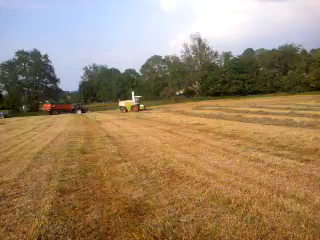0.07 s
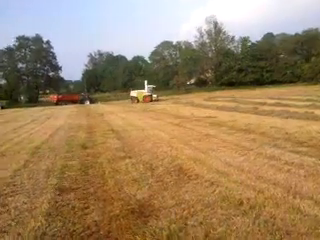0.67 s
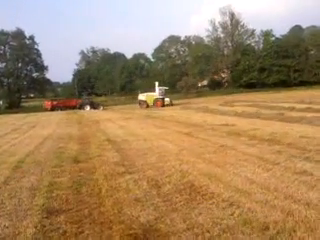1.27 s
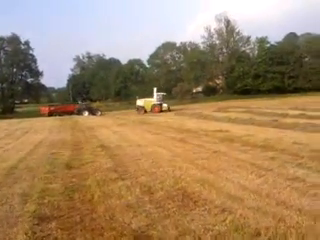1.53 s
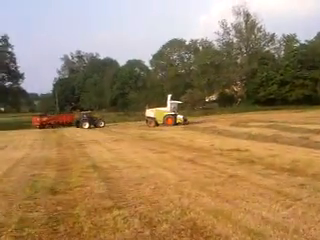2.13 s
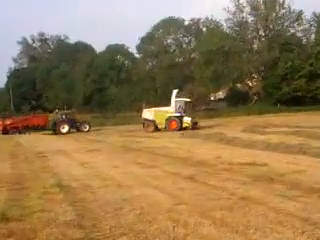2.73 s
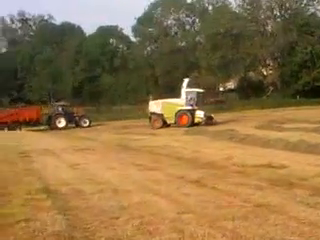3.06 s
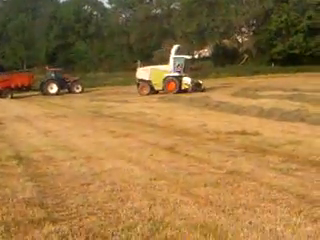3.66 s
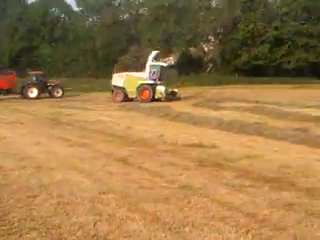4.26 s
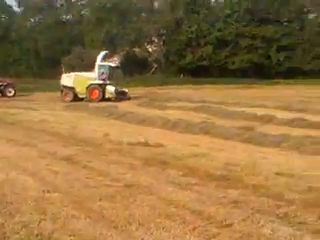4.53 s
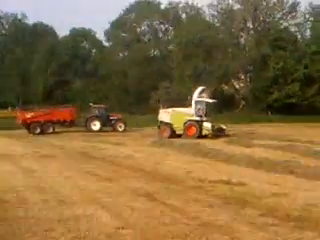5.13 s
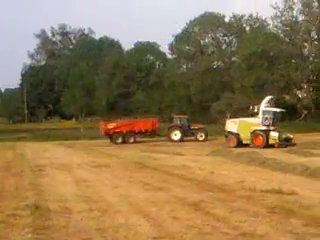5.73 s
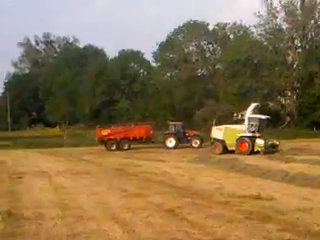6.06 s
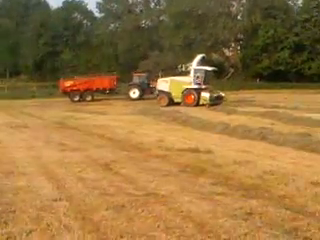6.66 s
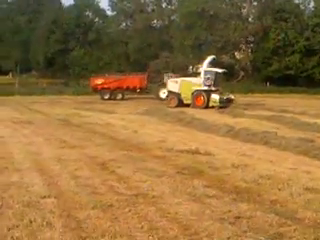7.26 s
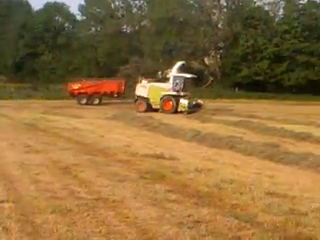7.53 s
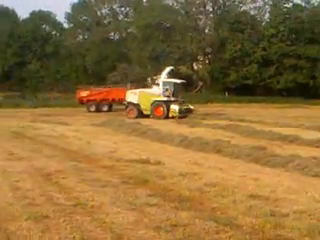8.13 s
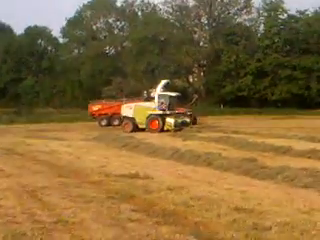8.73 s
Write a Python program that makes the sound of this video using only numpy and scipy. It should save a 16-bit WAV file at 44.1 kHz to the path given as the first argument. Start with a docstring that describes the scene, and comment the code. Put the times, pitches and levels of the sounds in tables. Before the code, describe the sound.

Wind bumps and rumbles on the microphone over the steady diesel roar of a harvester and tractor across a field.

```python
"""A forage harvester roars across a distant stubble field beside a tractor and trailer; both diesels drone.
Its chopper and blower make broadband noise, its exhaust harmonics, its cutter drum and drive train whines.
A hand cupped near the microphone makes the roar honk, then slides away with a short swoosh.
Gusts buffet the small camera's microphone with short eddies, and the strongest ones overload it."""
import sys
import numpy as np
from scipy import signal
from scipy.fft import rfft, irfft, next_fast_len
from scipy.io import wavfile
from scipy.ndimage import uniform_filter1d, map_coordinates

SR = 44100
rng = np.random.default_rng(int(sys.argv[2]) if len(sys.argv) > 2 else 0)


def digitize_waveform(pressure):
    """Quantize a signal to 16-bit integers and store it at the path in sys.argv[1].

    Rows of a 2-D input are taken as channels; values are limited to [-1, 1].
    """
    field = np.atleast_2d(pressure).T
    bounded = np.clip(field, -1, 1)
    quanta = np.round(bounded * 32767).astype(np.int16)
    wavfile.write(sys.argv[1], SR, quanta)


N = 392490
TIME_S = np.arange(N) / SR
FIRING_HZ = 123.8  # the harvester's diesel
BREEZE_DB = -32.5  # wind level between gusts
OPEN_S = 0.68  # the microphone opens


def amp(db):
    """Amplitude ratio of a level in decibels."""
    return 10 ** (np.asarray(db) / 20)


def unit(x):
    """Normalisation to rms 1."""
    return x / np.sqrt(np.mean(x ** 2) + 1e-20)


def envelope(rows):
    """Amplitude envelope through (time_s, level_db) points."""
    return amp(np.interp(TIME_S, *np.transpose(rows)))


def swells(base_db, rows):
    """Powers add: the level in dB of a steady base plus Gaussian swells."""
    extra = sum(amp(db) ** 2 * np.exp(-((TIME_S - s) / length) ** 2) for s, db, length in rows)
    return 10 * np.log10(amp(base_db) ** 2 + extra)


def along(points, hz):
    """Interpolation of (frequency_hz, level_db) points on a log-frequency axis."""
    f, db = np.transpose(points)
    return np.interp(np.log(hz + 1), np.log(f), db)


def bell(hz, centre, width):
    """A Gaussian of height 1 on the log-frequency axis."""
    return np.exp(-(np.log((hz + 1) / centre) / width) ** 2)


def wobble(rate_hz):
    """Slow random modulation: a spline through rate_hz knots a second."""
    knots = rng.standard_normal(int(N * rate_hz / SR) + 4)
    return map_coordinates(knots, [TIME_S * rate_hz])


def filtered(x, response):
    """Linear filtering: the spectrum times a frequency response."""
    m = next_fast_len(len(x) + 8192)
    return irfft(rfft(x, m) * response(np.fft.rfftfreq(m, 1 / SR)), m)[:len(x)]


def noise(spectrum):
    """Coloured noise of rms 1, silent above the spectrum's last point."""
    white = rng.standard_normal(N)
    return unit(filtered(white, lambda hz: amp(along(spectrum, hz)) * (hz < spectrum[-1][0])))


def whine(centre_hz, width_hz):
    """A narrow resonance driven by noise gives a rough pitch, at rms 1."""
    white = rng.standard_normal(N)
    return unit(filtered(white, lambda hz: 1 / (1 + ((hz - centre_hz) / width_hz) ** 2)))


def far(x, patchy_db):
    """Frequency-selective fading: moving air makes each band swell and fade on its own."""
    bands = signal.stft(x, nperseg=1024)[2]
    fading = uniform_filter1d(rng.standard_normal(bands.shape), size=9, axis=0)
    fading = unit(uniform_filter1d(fading, size=8, axis=1))
    return unit(signal.istft(bands * amp(patchy_db * fading), nperseg=1024)[1][:N])


def tone(hz, fading_db, smear_rad):
    """Scintillation: a distant tone of rms 1 flutters in amplitude and phase on its way."""
    phase = 2 * np.pi * np.cumsum(hz) / SR + smear_rad * wobble(14)
    return unit(amp(fading_db * np.tanh(wobble(9))) * np.sin(phase))


def wind(wind_db):
    """Turbulence rumbles at the microphone port; faster air adds smaller, higher swirls."""
    # spectrum of the large swirls: frequency_hz, density_db
    rumble_spectrum = [(20, -19), (45, -11.5), (70, -5.5), (110, 6), (170, 2.5), (250, -6.5), (350, -13.5),
                       (500, -23), (1000, -45.5)]
    # spectrum of the fine swirls: frequency_hz, density_db
    flutter_spectrum = [(100, -12.5), (220, 3), (330, -4), (500, -6.5), (800, -9), (1400, -19.5),
                        (3500, -29.5)]
    gust_db = wind_db - BREEZE_DB
    lumps = np.tanh(wobble(30))
    rumble = unit(amp(3.4 * lumps) * noise(rumble_spectrum))
    flutter = unit(amp(lumps + 6.4 * np.tanh(wobble(45))) * noise(flutter_spectrum))
    return amp(-30 + 0.85 * gust_db) * rumble + amp(-44 + 1.464 * gust_db) * flutter


def eddies(rows):
    """Each eddy is a pressure transient: uneven swings that rise fast, die slower and shed finer swirls."""
    out = np.zeros(N + SR)
    t = np.arange(-SR // 8, SR // 8) / SR
    for centre_s, db, pitch_hz, length_s in rows:
        unrest = unit(filtered(rng.standard_normal(len(t)), lambda hz: np.exp(-(hz / pitch_hz) ** 2)))
        swing_hz = pitch_hz * (1 + 0.55 * np.tanh(unrest))
        phase = 2 * np.pi * (np.cumsum(swing_hz) / SR + rng.random())
        swirls = unit(filtered(rng.standard_normal(len(t)), lambda hz: bell(hz, 1.4 * pitch_hz, 0.88)))
        swell = np.exp(-(t / (length_s * np.where(t < 0, 0.55, 1.02))) ** 2)
        pressure = 0.65 * np.sin(phase) + 0.16 * amp(0.69 * db) * swirls
        out[round((centre_s + t[0]) * SR):][:len(t)] += amp(db) * swell * pressure
    return out[:N]


def small_eddies(wind_db, per_s=12):
    """Turbulence brings eddies at random: the stronger the wind, the harder, higher and shorter."""
    slots_s = np.arange(OPEN_S, N / SR, 1 / per_s)
    time_scatter, level_scatter, pitch_scatter = rng.uniform(-1, 1, size=(len(slots_s), 3)).T
    centre_s = slots_s + time_scatter / per_s / 2
    local_db = np.interp(centre_s, TIME_S, wind_db)
    level_db = np.minimum(local_db + 11 + 3 * level_scatter, -7)
    pitch_hz = 148 * 2 ** (0.045 * (local_db - BREEZE_DB) + 0.35 * pitch_scatter)
    length_s = 2.2 / pitch_hz  # 2.2 cycles
    return eddies(zip(centre_s, level_db, pitch_hz, length_s))


def hard_eddies():
    """The largest pressure swings of the turbulence strike the microphone as separate thumps."""
    # strong eddies: centre_s, level_db, pitch_hz, length_s
    thumps = [(0.714, -2, 270, .025), (1.126, -6.5, 250, .018), (1.515, -2, 290, .011),
              (1.544, -0.3, 245, .016), (1.576, 0, 191.4, .007), (1.664, -1, 245, 0.02),
              (1.891, -8, 210.7, 0.013), (1.944, -8.5, 370, 0.0062), (2.052, .5, 210, 0.0049),
              (2.38, -5.5, 150.4, 0.011), (2.429, -.5, 159, 0.012), (2.511, 1.5, 609, .004),
              (2.536, 0.5, 280, 0.015), (2.585, -1.5, 340, 0.033), (2.636, 1, 560, 0.0028),
              (2.688, 1.2, 480, .0045), (2.764, -1.5, 400, .018), (2.807, -2.5, 200, 0.0067),
              (2.94, -2, 370, .005), (2.958, -1.5, 330, .006), (2.982, -.5, 210, 0.01),
              (3.018, 0.5, 320, .0035), (3.255, -6.5, 220, 0.017), (3.33, -7, 340, 0.0074),
              (3.555, -3.5, 185, 0.0098), (4.155, -7, 215, .03), (4.377, -11, 320, 0.019),
              (4.497, -13, 450, .007), (4.563, 1.3, 220, .006), (4.595, -5.5, 195, .025),
              (4.66, -8.5, 199.2, 0.015), (6.744, 1, 160, .008), (6.795, -7.5, 160, .019),
              (7.298, -11, 158.9, 0.028), (7.658, -9, 144.1, 0.019), (8.66, -8.5, 160, 0.05)]
    return eddies(thumps)


def past_hand(x, slide_s=4.82, time_constant_s=0.12):
    """Cavity resonance in a cupped palm colours sound; as it opens, a notch and a peak slide down."""
    # response of the palm's hollow: frequency_hz, gain_db
    hollow = [(250, -2.5), (500, -4), (700, 2), (900, 9.5), (1170, -0.5), (1500, 8), (1750, 7.5),
              (2000, 5.5), (2300, -1), (2750, -5), (3300, -1), (4000, -0.5)]
    cupped_hz, open_hz = 2900, 1600
    hz, t, bands = signal.stft(x, SR, nperseg=512)
    hz = hz[:, None]
    cupping = np.exp(-np.maximum(t - slide_s, 0) / time_constant_s)
    notch_hz = open_hz + (cupped_hz - open_hz) * cupping
    depth_db = 1.5 * cupping + 6.5 * np.sin(np.pi * cupping)  # deepest in mid slide
    ripple = bell(hz, 1.45 * notch_hz, width=0.19) - bell(hz, notch_hz, width=0.39)
    gain_db = cupping * along(hollow, hz) + depth_db * ripple
    return signal.istft(bands * amp(gain_db), nperseg=512)[1][:N]


def squeak(centre_s=8.37, half_length_s=0.025):
    """A short burst of narrow-band noise is heard as a rough squeak from the machines."""
    swell = np.exp(-((TIME_S - centre_s) / half_length_s) ** 2)
    return amp(-31) * swell * whine(2350, width_hz=82)


def tractor(firing_hz=113.1):
    """The tractor's firing note lies close to the harvester's, so the two interfere and beat."""
    # course of the drone: time_s, level_db
    drone_levels = [(0.7, -40.5), (5.1, -42), (5.7, -30), (7.9, -31.5), (8.9, -28.5)]
    pitch_hz = firing_hz * (1 + 0.002 * wobble(2))
    return envelope(drone_levels) * tone(pitch_hz, fading_db=1.5, smear_rad=0.25)


def cutter(firing_hz, pitch_hz=1826, rough_share=0.45):
    """The drum's tone is proportional to engine speed; passing crop adds narrow-band noise."""
    # swells of the whine, relative to the roar: centre_s, level_db, half_length_s
    surges = [(1.82, -8.5, 0.13), (3.754, -10.5, .38)]
    clean = np.sqrt(1 - rough_share) * tone(pitch_hz * firing_hz / FIRING_HZ, fading_db=3, smear_rad=1)
    rough = np.sqrt(rough_share) * whine(pitch_hz, width_hz=15)
    return amp(swells(base_db=-17, rows=surges)) * (clean + rough)


def harvester():
    """Periodic firing gives exhaust harmonics and modulates the chopper's roar, amid whines and hiss."""
    # spectrum of the chopper: frequency_hz, density_db
    chopper_spectrum = [(200, -7), (430, -7.5), (640, 0.5), (900, -3.5), (1170, 3), (1400, 1), (1650, -1),
                        (1950, -0.5), (2500, -4.5), (3000, -8), (3600, -12.5), (4000, -25), (4500, -41)]
    # exhaust partials, relative to the roar: harmonic_number, level_db
    harmonics = [(1, -7.5), (2, -11), (4, -15), (5, -23.5), (6, -21.5), (7, -20), (8, -23), (9, -17.5),
                 (10, -20), (11, -17.5)]
    # drive train resonances, relative to the roar: pitch_hz, width_hz, level_db
    resonances = [(1513, 4.6, -16.5), (1121, 13, -12.5), (1240, 29, -20.5)]
    # course of the roar: time_s, level_db
    roar_levels = [(0.7, -28), (1.05, -26), (1.4, -28.5), (2.9, -29), (3.6, -29), (6.1, -28.5),
                   (8.9, -29.5)]
    # spectrum of the blower: frequency_hz, density_db
    blower_spectrum = [(2200, -23.5), (3000, -1.5), (3500, 0.5), (3800, -1), (4200, -14.5), (4600, -32.5)]
    # course of the blower's hiss: time_s, level_db
    hiss_levels = [(0.7, -47.5), (1.9, -40.5), (2.3, -48), (4.4, -51.5), (5.2, -46.5), (6.1, -44),
                   (6.4, -52), (8.9, -56.5)]
    firing_hz = FIRING_HZ * (1 + 0.001502 * wobble(3))
    throb = 1 + 0.12 * np.sin(2 * np.pi * np.cumsum(firing_hz) / SR)
    churn = amp(1.1 * wobble(40))
    chopper = throb * churn * far(noise(chopper_spectrum), patchy_db=1.49)
    exhaust = sum(amp(db) * tone(k * firing_hz, fading_db=2, smear_rad=0.5) for k, db in harmonics)
    drive = sum(amp(db) * whine(hz, width) for hz, width, db in resonances)
    hiss = envelope(hiss_levels) * churn * far(noise(blower_spectrum), patchy_db=3)
    return envelope(roar_levels) * (chopper + exhaust + drive + cutter(firing_hz)) + hiss


def scene():
    """Superposition: distant machines, filtered by the hand, add to the wind at the microphone."""
    # gusts of wind: centre_s, level_db, half_length_s
    gusts = [(0.979, -25, .13), (1.58, -24.5, .09), (1.97, -25, .12), (2.331, -23.5, .14),
             (2.633, -14.5, .16), (3.194, -21.5, .36), (4.159, -24.5, .06), (4.518, -23, .12),
             (5.55, -27, .16), (6.652, -27, .17), (8.698, -24, .23)]
    wind_db = swells(BREEZE_DB, gusts)
    machines = past_hand(harvester() + tractor() + squeak())
    return (machines + wind(wind_db) + hard_eddies() + small_eddies(wind_db))[None]


def record(dry):
    """A band-limited microphone opens late, fades in and saturates on the strongest eddies."""
    ramp_s, fade_s, fade_db = 0.014, 0.17, -11.5
    low_hz, high_hz, top_hz = 61.3, 4400, 15800
    since_s = TIME_S - OPEN_S
    gate = np.clip(since_s / ramp_s, 0, 1)
    fade = amp(fade_db * np.clip(1 - since_s / fade_s, 0, 1))
    narrow = filtered(dry[0] * gate * fade,
                      lambda hz: 1 / np.sqrt((1 + (hz / high_hz) ** 60) * (1 + (low_hz / (hz + 1)) ** 6)))
    clipped = np.clip(narrow, -0.71, 0.71)
    return filtered(clipped, lambda hz: hz < top_hz)[None]


dry = scene()
out = record(dry)
digitize_waveform(out)
```